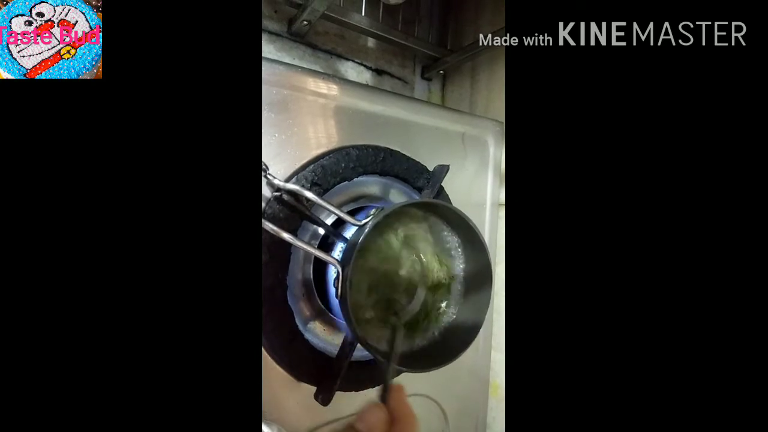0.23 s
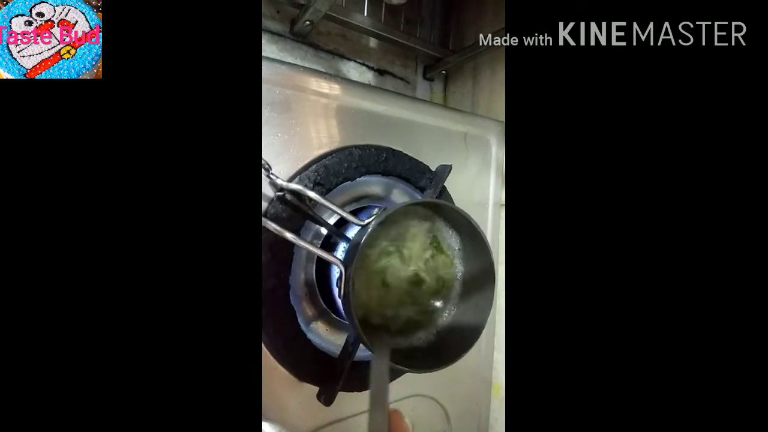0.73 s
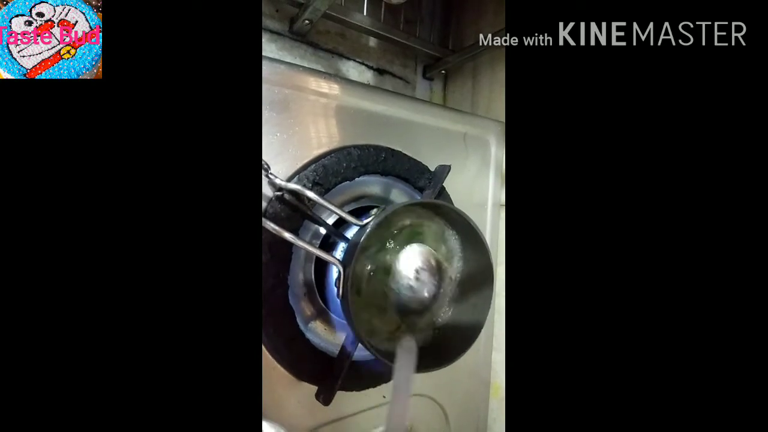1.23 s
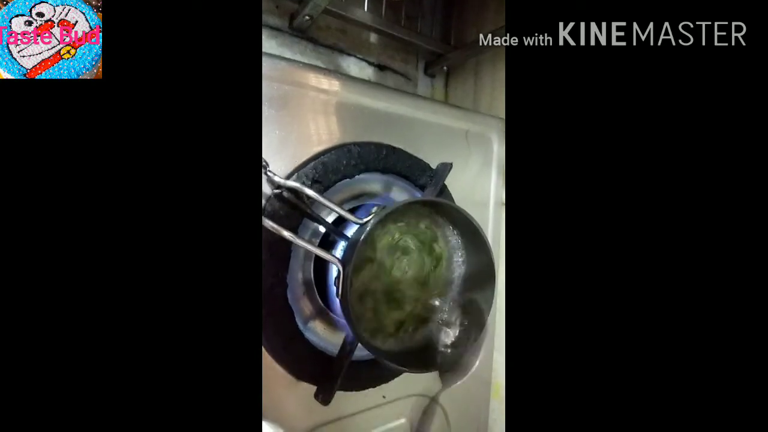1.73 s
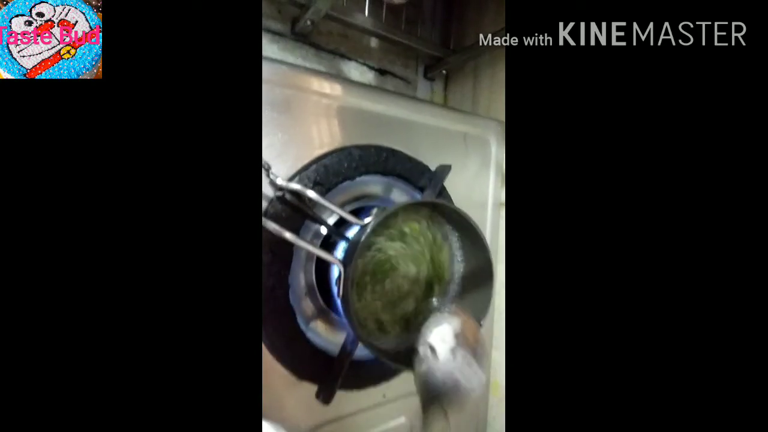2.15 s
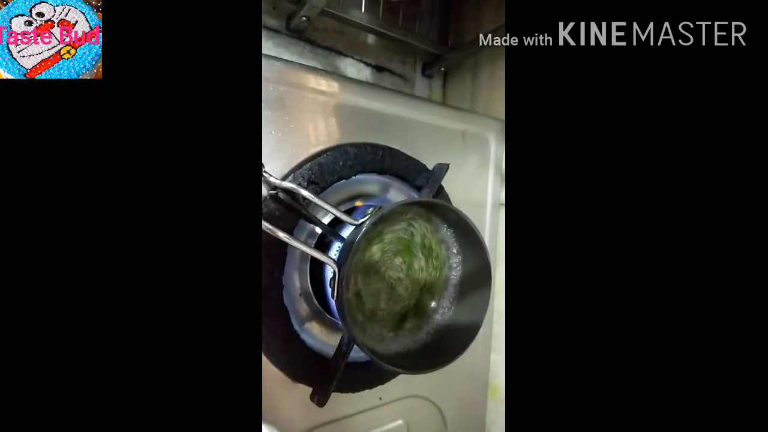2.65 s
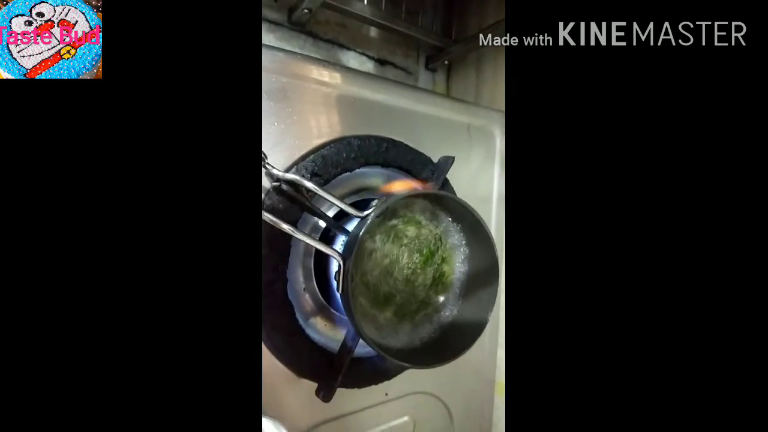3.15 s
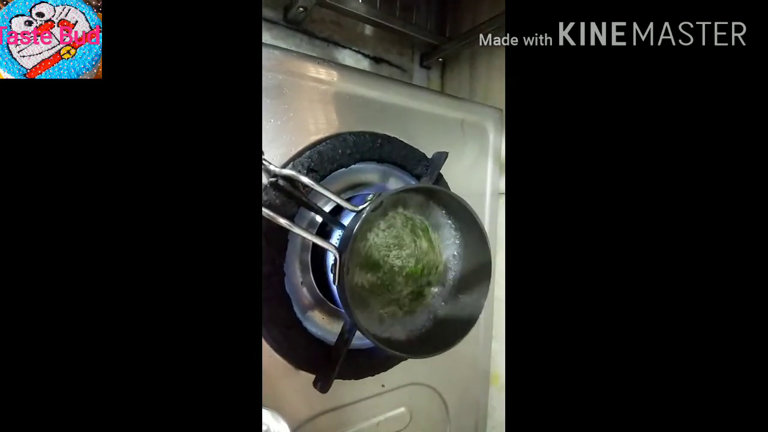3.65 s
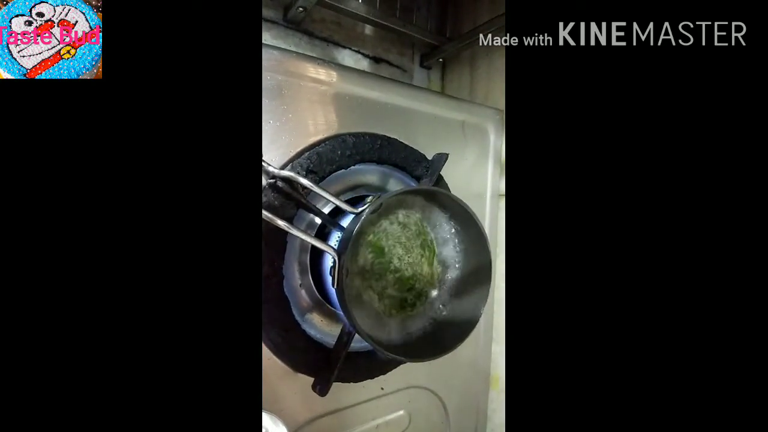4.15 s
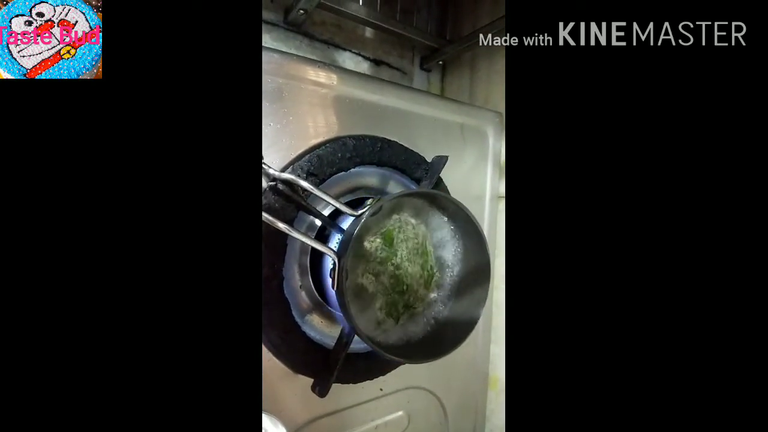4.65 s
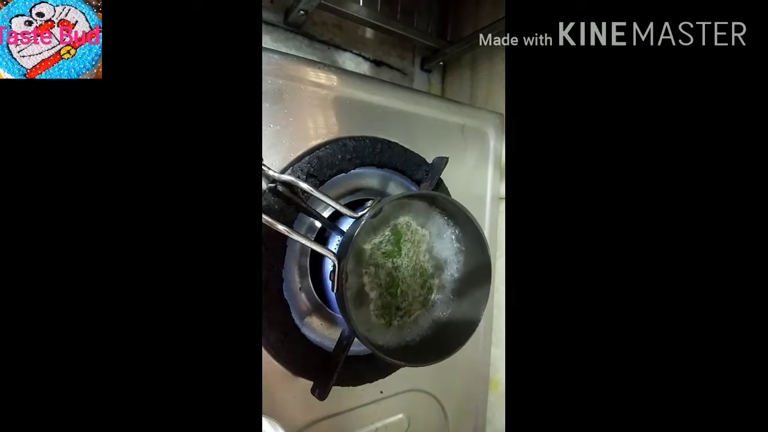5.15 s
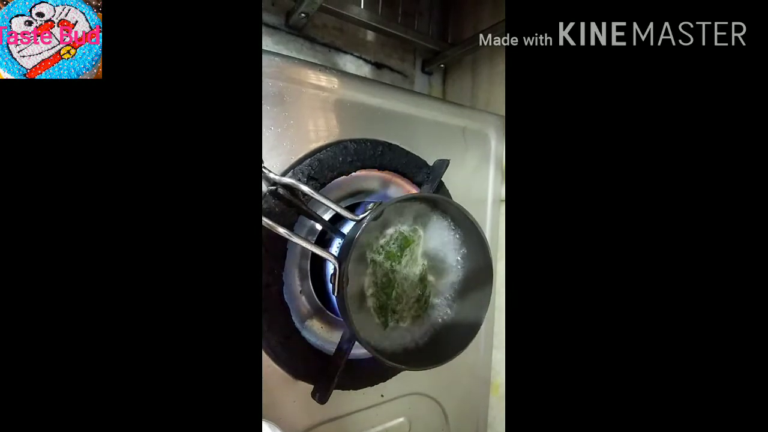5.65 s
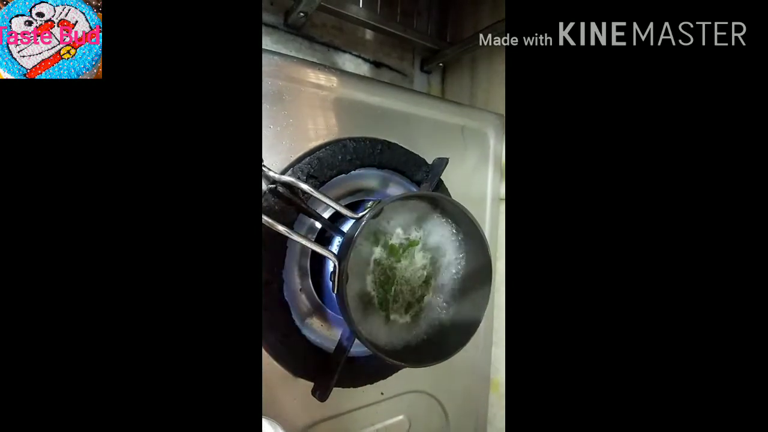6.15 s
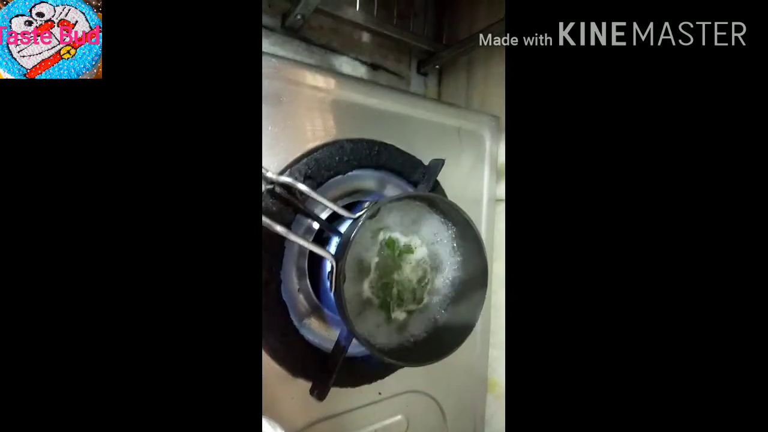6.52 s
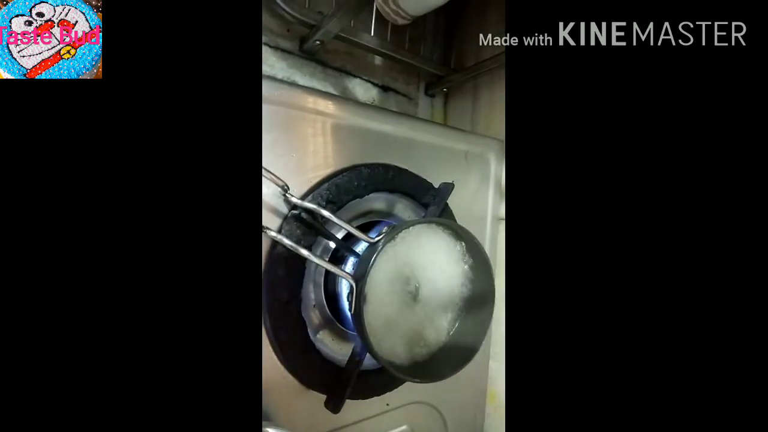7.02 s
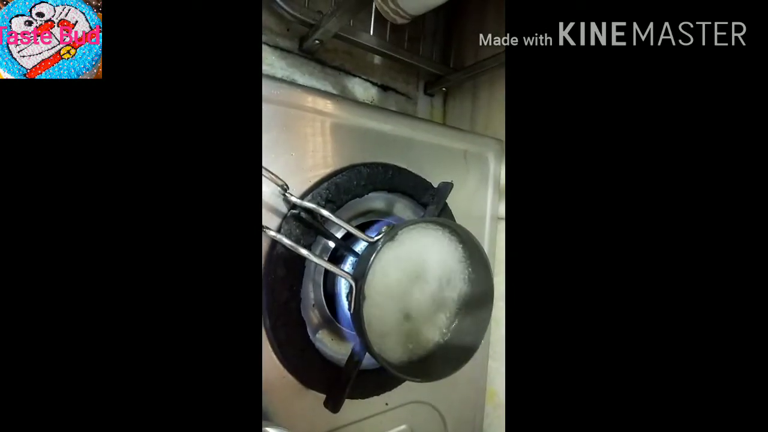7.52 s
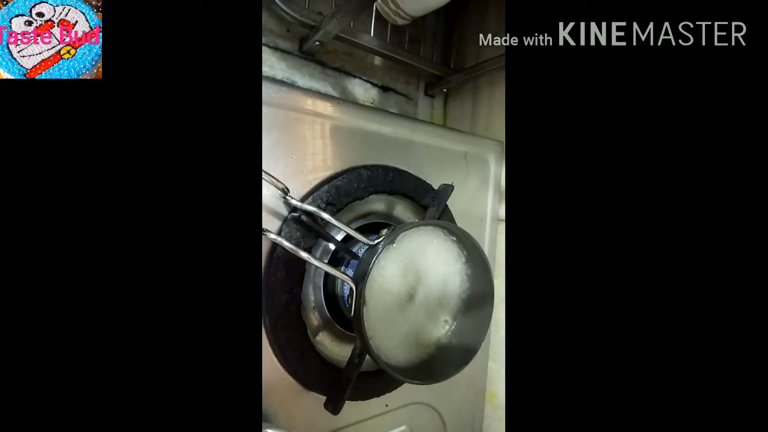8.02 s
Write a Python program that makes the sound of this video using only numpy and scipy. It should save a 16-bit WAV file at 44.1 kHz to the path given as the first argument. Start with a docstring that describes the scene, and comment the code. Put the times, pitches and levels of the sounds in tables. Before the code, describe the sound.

Close to the microphone and to its right, a spoon briefly scrapes and clinks in a steel saucepan of sizzling, oily liquid. The bubbling carries on, with droplets cracking irregularly and the gas burner hissing underneath. Later the hiss drops and a softer foamy fizz joins in. Throughout, distant thumps repeat evenly behind a low kitchen rumble, and a few faint rough tones sound.

```python
"""A dense sizzle and a spoon scraping steel: syrup with oil boils in a small pan over a hissing gas flame,
close to the right of a stereo microphone. Bursting bubbles make the sizzle; droplets spit and crack.
Later the pan foams up and sounds softer. Someone pounds steadily elsewhere in the house,
low noise rumbles in the kitchen's resonances, and a few short rough tones sound."""
import sys
import numpy as np
from scipy import signal
from scipy.fft import rfft, irfft, next_fast_len
from scipy.io import wavfile
from scipy.ndimage import uniform_filter1d, map_coordinates

SR = 44100
rng = np.random.default_rng(int(sys.argv[2]) if len(sys.argv) > 2 else 0)


def waveform_to_disk(signal):
    """Save audio, clipped to [-1, 1], as 16-bit WAV at the path in sys.argv[1]."""
    frames = np.transpose(np.atleast_2d(signal))
    scaled = np.clip(frames, -1, 1) * 32767
    samples = np.round(scaled).astype(np.int16)
    wavfile.write(sys.argv[1], SR, samples)


N = 364795

FOAM_START_S, LEFT_LAG_S, BAND_LIMIT_HZ = 6.39, 6.8e-5, 15700
SURGE_DB, SURGE_LEFT_DB, SURGE_DECAY_S, HALF_SURGE_SPIT_DB = 8.5, 4, 0.031, -12.5
FAINT_DROPS_PER_S, FAINT_DROP_DB = 4, -29
BUBBLES_PER_S, BUBBLE_MEDIAN_HZ, BUBBLE_T60_CYCLES, BUBBLE_DB = 600, 8784, 42, -15.5

# Stereo likeness: (frequency [Hz], left-right correlation [1])
CORRELATION = [(60, 1), (180, 0.9), (330, 0.82), (560, 0.4), (1650, 0.41), (4970, 0.44), (15000, 0)]
# Stereo balance, general and sizzle: (frequency [Hz], left minus right [dB])
BALANCE = [(60, 1), (150, 2), (380, 3), (950, -6.5), (2380, -10), (5980, -3.5), (15000, -15)]
SIZZLE_BALANCE = [(4000, -6), (8000, -1), (13000, 7.5)]
# Four groups of kitchen resonances: (centre [Hz], width [Hz], gain [dB])
BOOM_MODES = [(77, 16, -7), (103.4, 10, -3), (153, 35, -0.5), (234, 18, -1)]
HUM_MODES = [(272.5, 28, 0), (371, 52, -3), (478, 97, -8.5)]
MOAN_MODES = [(544, 25, -5), (592, 102, 15)]
DRONE_MODES = [(698, 89, 11.5), (815, 90, 10), (1081, 164, 9)]
# Rumble per group, same order: (centre [Hz], roar share [dB], resting level [dB])
RUMBLE_GROUPS = [(130, -10.5, -70), (275, -5.5, -127), (580, -1, -81), (800, -3, -103)]
# Roar during the stirring: (time [s], lower groups [dB], upper groups [dB])
ROAR_LEVELS = [(0, -34.5, -39), (.25, -32, -44), (.4, -34.5, -51), (.55, -32, -40.5), (.65, -29, -39.5),
               (.72, -31, -39.5), (.8, -43.5, -34.5), (.87, -34.5, -44), (.97, -47.5, -56),
               (1.15, -54, -93)]
# Murmur after the roar: (time [s], hum [dB], drone [dB])
MURMUR_LEVELS = [(1.1, -84, -70), (1.32, -66, -77), (1.55, -74, -59), (1.65, -86, -55.5), (1.85, -80, -72),
                 (2.2, -65, -61.5), (2.6, -76, -56.5), (3.3, -66, -59.5), (3.6, -55, -55.5),
                 (4.4, -55.5, -57.5), (4.85, -50.5, -53.5), (5.4, -50, -64.5), (6.1, -59, -59),
                 (6.6, -56.5, -68), (6.8, -59, -63.5), (7.6, -71, -68), (7.8, -55, -63), (7.92, -51.5, -74),
                 (8.0, -52, -52), (8.27, -56, -65)]
# Rumble swells: (middle [s], half length [s], level [dB], group centre [Hz])
RUMBLE_SWELLS = [(1.458, 0.068, -54, 130), (2.197, 0.13, -62, 130), (2.564, 0.27, -58, 130),
                 (3.15, 0.064, -62, 580), (3.75, 0.63, -60.5, 580), (4.19, 0.14, -60, 130),
                 (4.906, 0.37, -59.5, 580), (4.924, 0.25, -59, 130), (6.145, 0.12, -56, 130),
                 (6.724, 0.066, -65, 130), (7.317, 0.048, -53, 580), (7.3, 0.12, -60, 130),
                 (7.543, 0.12, -52, 580), (8.016, 0.057, -48, 580), (8.223, 0.14, -46.5, 130)]
# Rough tones: (time [s], start [Hz], end [Hz], level [dB], rise [s], t60 [s], waver [1])
ROUGH_TONES = [(1.38, 765, 650, -49, 0.041, 7, 0.004), (7.775, 81.3, 80, -57, .01, 4.6, .002),
               (7.605, 3390, 3390, -43, 0.025, 0.8, 0.0005), (7.98, 573, 576, -38, 0.011, 0.44, 0.003),
               (7.98, 236, 240, -24, 0.0071, 0.13, 0.0027)]
# Distant blows: (time [s], base level [dB], slap offset [dB], floor ring [Hz])
DISTANT_BLOWS = [(0.485, -25, -21, 233), (0.651, -24.5, -4, 165), (1.341, -21.5, -13.5, 151),
                 (2.017, -22.5, -14, 168), (2.68, -21.5, -16, 159), (3.341, -21, -19, 152.3),
                 (3.999, -21, -16, 156), (4.646, -22.5, -13, 167), (5.329, -24.5, -15, 160),
                 (6.003, -22.5, -15, 168), (6.528, -22.5, -21, 161), (7.155, -22, -18, 162),
                 (7.722, -31, -24, 213), (7.773, -21, -18, 164.5), (7.981, -29.5, -10, 212),
                 (8.229, -27.5, -45, 225)]
# Gas hiss: (time [s], level [dB])
FLAME_LEVELS = [(0, -38.5), (.55, -37), (1.0, -39.5), (3.1, -38.5), (4.2, -39.5), (6.37, -38.5),
                (6.41, -48), (8.27, -47)]
# Spoon friction: (time [s], level [dB])
SCRAPE_LEVELS = [(0, -40.5), (.25, -38), (.33, -36), (.5, -38.5), (.65, -38), (.82, -39), (.9, -53),
                 (.95, -80)]
# Scraped steel: (centre [Hz], width [Hz], gain [dB])
SCRAPE_MODES = [(1096, 150, 3.5), (1810, 210, 3), (2570, 280, -1), (3170, 140, -3), (4400, 60, 4.5),
                (5360, 70, 5)]
# Spoon taps: (time [s], level [dB], knock over tick [dB])
SPOON_TAPS = [(.254, -27, -30), (.2835, -17.5, -30), (.335, -33, -30), (.6505, -33, 9), (.671, -44, 12),
              (.79, -40, 9)]
# Thin pan wall and thick bottom: (frequency [Hz], gain [dB], t60 [s])
WALL_MODES = [(3830, -14, 0.093), (3970, 0, 0.014), (4360, -6, 0.011), (4520, -13, .09), (5680, -15, .06),
              (6600, -26, .05)]
BOTTOM_MODES = [(641, -3, .12), (840, -3, .05), (1110, -1, .012), (1357, 0, .01), (1766, 0, .01)]
# Foam swelling and sinking: (time [s], relative level [dB])
FIZZ_LEVELS = [(6.39, -47.5), (6.546, -45.5), (6.866, -42.5), (7.07, -48.5), (7.3, -43.5), (7.572, -43.5),
               (7.824, -44.5), (8.27, -43.5)]
# Spectra of gas, fizz, sizzle before and during foaming, cracks: (frequency [Hz], gain [dB])
GAS_SPECTRUM = [(300, -62), (650, -40), (1100, -50), (1240, -18), (1410, -10), (1930, 0.5), (2180, -5),
                (2540, 3.5), (2900, -3), (3150, 0.5), (3440, -1), (5000, -1), (6500, -26), (11000, -120)]
FIZZ_SPECTRUM = [(530, -55), (1000, -8.5), (1400, -18), (1650, -18), (1850, -2.5), (3300, -5), (3700, -8),
                 (4500, -11), (5750, -23), (7000, -8), (9100, -35), (15400, -120)]
FRYING_SPECTRUM = [(900, -70), (1760, -26), (3000, -15.5), (4570, -6.5), (6020, -3.5), (6540, -1),
                   (8160, 1.5), (8980, 4.5), (12000, 8), (14700, 6.5), (15600, 1.5)]
FOAMING_SPECTRUM = [(900, -60), (1760, -19), (3000, -15), (3700, -26), (4510, -9.5), (5200, -8), (5750, -9),
                    (6300, -6.5), (9830, 7), (15600, 1.5)]
CRACK_SPECTRUM = [(500, -58), (1500, -3), (3000, -12), (5000, -14.5), (8000, -9), (11000, -6.5),
                  (16000, -10)]
# Sizzle between spits: (time [s], level [dB], left minus right [dB])
SIZZLE_LEVELS = [(0, -30.5, -17), (.3, -28.5, -13), (.62, -28.5, -14.5), (.96, -33.5, -18),
                 (1.3, -31.5, -12), (1.5, -35.5, -22), (2.15, -35.5, -18), (2.5, -32.5, -13),
                 (2.8, -31, -12.5), (3.55, -31.5, -13.5), (3.7, -34, -16), (4.55, -33.5, -15),
                 (4.7, -29, -13), (5.7, -31, -9.5), (6.05, -31.5, -12.5), (6.3, -26.5, -6.5),
                 (6.45, -31, -12), (6.9, -31, -11.5), (7.4, -31, -12), (7.87, -32, -13), (8.27, -30.5, -11)]
# Droplets: (time [s], level [dB], centre [Hz], pop offset [dB], left minus right [dB], spray offset [dB])
DROPLETS = [(0.045, -24, 10700, -18, -9, -8), (.181, -23.5, 9350, -6, -18, 2),
            (0.2282, -13.5, 8650, -23, -19, -17), (0.231, -14, 9600, -12, -8, -12),
            (.4104, -22, 10400, -22, -9, -4), (0.6518, -26, 11800, 8, -6, 5),
            (0.8078, -22.5, 8500, 2, -17, 4), (.9673, -31, 10500, -30, -10, -8),
            (1.004, -15, 13700, -32, -8, -1.5), (1.0232, -11.5, 11100, -15, -5, -13),
            (1.1215, -16, 8050, -36, -18.5, -5.5), (1.2405, -8, 9800, -38, -9.5, -8),
            (1.336, -7, 11700, -40, -8, -6), (1.6737, -25, 10200, -28, -15, -4),
            (1.749, -24, 9300, -32, -21, -4), (2.2516, -12.5, 10600, -40, -12.5, -9),
            (2.371, -8, 8400, -8, -11.5, -4), (2.4316, -27.5, 11300, -12, -7, 11.5),
            (2.561, -5.5, 10520, -38.5, -4.5, -3.5), (2.577, -1, 11100, -5, -4.5, -7),
            (2.6639, -10.5, 11300, -6.5, -6, -13), (2.72, -9, 12800, -25, -3, -13),
            (2.783, -21, 12800, -30, 0, -2), (2.7961, -6, 10400, -15, -8, -8),
            (2.8837, -16, 12100, -11, -8, -11), (2.8868, -6.5, 11800, -25, -9, -15),
            (2.9135, -29, 8600, -30, -8, -10), (2.955, -16.5, 10900, -7, -14, -13),
            (3.0285, -14, 13600, -28, -8, -9), (3.1024, -11, 11700, -3.5, -3, -5),
            (3.2077, -15.5, 13800, -30.5, -10, -0.5), (3.2442, -13, 12100, -28, -9, -10),
            (3.25, -17, 9200, -30, -2, 5), (3.2654, -16, 10750, -35, -4, 2),
            (3.326, -13.5, 8550, -12, -8, -8), (3.372, -25, 12200, -9, -19, -9),
            (3.403, -17, 12000, -2, -9, -19), (3.41, -14, 12200, -10, -11, -12),
            (3.488, -3.5, 8850, -21, -3, -19), (3.574, -17, 12600, -9, -6, 4),
            (3.5933, -24.5, 13000, -25, -9, 11), (3.6402, -21, 11100, -30, -13, -3),
            (3.832, -20, 8000, -30, -8, -12), (3.839, -10, 10200, -27, -7, -5),
            (3.9556, -17, 13400, -24, -7, -8), (4.01, -23, 10700, -14, -13, -4),
            (4.025, -22, 9000, -30, -15, -8), (4.2982, -11, 10300, -25, -7, -6),
            (4.444, -14, 11300, -17, -13, -7), (4.8782, -16, 10700, -10, -5, 3),
            (4.951, -7.5, 11200, -23, -4, 2), (5.1295, -8.5, 11200, -22, -9, -7),
            (5.2928, -18, 10900, -20, -12, 3), (5.3324, -8.5, 10300, -3.5, -2, -0.5),
            (5.4126, -3.5, 10700, -14.5, 1, -10), (5.4942, -12.5, 11300, -10, -5, -4),
            (5.528, -15.5, 10500, -27, -5, -4), (5.559, -17, 11500, -30, -6, -8),
            (5.642, -12.5, 10600, -17, -3, -6), (5.684, -10, 9850, -9, -3, -2),
            (5.702, -12, 10500, -30, -4, -5), (5.738, -21, 11300, -4, 1, -1),
            (5.876, -13, 10600, -18, -6, 3), (5.895, -15, 9500, -30, -4, -10),
            (5.911, -15, 9870, -21, -3, 4), (6.1387, -22, 12100, -32, -15, -2),
            (6.178, -24, 10500, -35, 5, -8), (6.2138, 1, 11070, -16, 6, -4.5),
            (6.3458, -19.5, 10900, -5, -1, 9), (6.64, -14.5, 10100, -34, -10, -4),
            (6.7539, -5, 10000, -7, -4, -4.5), (6.8893, -14.5, 9700, -26, -9, 2.5),
            (6.9067, -12.5, 10500, -29, -3, 0), (6.973, -18, 10600, -35, -6, 4.5),
            (7.0575, -13.5, 9500, -36, -6, 1), (7.3708, -16, 9500, -6, -3, -3),
            (7.432, -17.5, 10700, -8, -5, -11)]


def amp(db):
    """Gain of a level in dB."""
    return 10 ** (np.asarray(db) / 20)


def decay(t, t60_s):
    """Exponential fall, 60 dB in t60_s."""
    return amp(-60 * t / t60_s)


def unit_rms(x):
    """x at rms 1."""
    return x / np.sqrt(np.mean(x ** 2) + 1e-20)


def at_hz(points, hz):
    """Interpolate (frequency [Hz], value) points on a log axis."""
    knots_hz, values = np.transpose(points)
    return np.interp(np.log(hz + 1), np.log(knots_hz + 1), values)


def curves(rows):
    """Per-sample curve for each column after the time."""
    times_s, *columns = np.transpose(rows)
    return [np.interp(np.arange(N) / SR, times_s, column) for column in columns]


def wobble(knots_per_s):
    """Smooth random curve."""
    knots = rng.standard_normal(int(N * knots_per_s / SR) + 4)
    return map_coordinates(knots, [np.arange(N) * knots_per_s / SR])


def filtered(x, response):
    """Apply a complex frequency response."""
    size = next_fast_len(N + SR // 2)
    return irfft(rfft(x, size) * response(np.fft.rfftfreq(size, 1 / SR)), size)[..., :N]


def resonances(modes):
    """Response of parallel band-pass modes, alternating in sign."""
    return lambda hz: sum(
        (-1) ** k * amp(db) * 1j * hz * width_hz / (centre_hz ** 2 - hz ** 2 + 1j * hz * width_hz)
        for k, (centre_hz, width_hz, db) in enumerate(modes))


def sides(lean_db):
    """Channel gains for a left-minus-right level."""
    return amp(np.array([lean_db / 2, -lean_db / 2]))


def patchy_noise(depth_db):
    """Two noises sharing random gain patches in time and frequency."""
    spectra = signal.stft(rng.standard_normal((2, N)), nperseg=512)[2]
    patches = uniform_filter1d(rng.standard_normal(spectra.shape[1:]), size=6, axis=0)
    patches = uniform_filter1d(patches, size=8, axis=1)
    return signal.istft(spectra * amp(depth_db * unit_rms(patches)), nperseg=512)[1][:, :N]


def at_mic(pair, response):
    """Filter two independent signals into stereo: alike in the bass, treble to the right, left late."""
    def mid_side_gains(hz):
        angle = np.arccos(np.clip(at_hz(CORRELATION, hz), -1, 1)) / 2
        return response(hz) * [np.cos(angle), np.sin(angle)]

    mid, side = filtered(pair, mid_side_gains)
    lag_s = np.array([[LEFT_LAG_S], [0]])
    return filtered(np.array([mid + side, mid - side]),
                    lambda hz: sides(at_hz(BALANCE, hz)) * np.exp(-2j * np.pi * hz * lag_s))


def rumble():
    """Unsteady noise rings the kitchen's resonances: a roar, then a murmur with short swells."""
    total, t = 0, np.arange(N) / SR
    lower_db, upper_db = curves(ROAR_LEVELS)
    hum_db, drone_db = curves(MURMUR_LEVELS)
    layers = [(BOOM_MODES, lower_db, 0), (HUM_MODES, lower_db, amp(hum_db)),
              (MOAN_MODES, upper_db, 0), (DRONE_MODES, upper_db, amp(drone_db))]
    for (centre_hz, share_db, rest_db), (modes, roar_db, murmur) in zip(RUMBLE_GROUPS, layers):
        swells = sum(amp(db) * np.exp(-((t - middle_s) / half_s) ** 2)
                     for middle_s, half_s, db, hz in RUMBLE_SWELLS if hz == centre_hz)
        gain = amp(roar_db + share_db) + amp(rest_db) + murmur + swells
        noise = amp(1.8 * wobble(14) + 1.6 * wobble(4)) * patchy_noise(depth_db=3)
        room = resonances(modes)
        ringing = at_mic(noise, lambda hz: room(hz) * np.abs(room(hz)) ** 1.2)  # deepened valleys
        total = total + gain * unit_rms(ringing)
    return total


def rough_tones():
    """Wavering sines: a hollow falling note, a thin squeak, a deep hum, a ringing bump."""
    out, t = np.zeros(N + SR), np.arange(int(0.7 * SR)) / SR
    for time_s, start_hz, end_hz, db, rise_s, t60_s, waver in ROUGH_TONES:
        drift = uniform_filter1d(np.cumsum(rng.standard_normal(len(t))), size=60)
        cycles = np.cumsum(np.linspace(start_hz, end_hz, len(t))) / SR
        tone = np.sin(2 * np.pi * cycles + drift * waver * np.sqrt(start_hz))
        fade = (1 - np.exp(-t / rise_s)) * np.sqrt(np.abs(np.cos(np.pi / 2 * t / t[-1])))
        flicker = amp(3 * wobble(40)[:len(t)])
        out[round(time_s * SR):][:len(t)] += amp(db) * decay(t, t60_s) * fade * flicker * tone
    return out[:N] * sides(-3.5)[:, None]


def pounding():
    """Each blow slaps, then thumps; the floor rings on and the room resonances die away."""
    thumps, slaps, echoes = np.zeros(N + SR), np.zeros((2, N + SR)), np.zeros((2, N + SR))
    t = np.arange(SR // 2) / SR
    thump_t = t - 0.0095
    echo_shape = (1 - np.exp(-t / 0.004)) * decay(t, 0.19)
    for time_s, db, slap_db, floor_hz in DISTANT_BLOWS:
        start = round(time_s * SR)
        span = slice(start, start + len(t))
        pulse = np.sin(2 * np.pi * 1.23 * floor_hz * thump_t) * np.exp(-0.5 * (thump_t / 0.0013) ** 2)
        floor = 0.4 * np.sin(2 * np.pi * floor_hz * thump_t) * decay(t, 0.15) * (thump_t > 0)
        thumps[span] += amp(db - 4.5) * (pulse + floor)
        slaps[:, span] += amp(db + slap_db + 10.5) * decay(t, 0.12) * rng.standard_normal((2, len(t)))
        echoes[:, span] += amp(db + 10.5) * echo_shape * rng.standard_normal((2, len(t)))
    direct = filtered(thumps[:N], lambda hz: hz ** 2 / (hz ** 2 + 70 ** 2))
    slap = at_mic(slaps[:, :N], resonances([(776, 120, 0.68), (1153, 124, 1)]))
    room = resonances(BOOM_MODES + HUM_MODES)
    return direct + slap + at_mic(echoes[:, :N], lambda hz: room(hz) / (1 + (hz / 450) ** 4))


def flame():
    """Gas jets hiss; the level drops as the foaming starts."""
    level_db, = curves(FLAME_LEVELS)
    hiss = at_mic(patchy_noise(depth_db=1.2), lambda hz: amp(at_hz(GAS_SPECTRUM, hz)))
    return amp(level_db) * unit_rms(hiss)


def spoon_scrape():
    """Uneven friction on the pan bottom rings the steel."""
    level_db, = curves(SCRAPE_LEVELS)
    friction = amp(2.5 * wobble(40)) * patchy_noise(depth_db=1.5)
    return amp(level_db) * unit_rms(at_mic(friction, resonances(SCRAPE_MODES)))


def spoon_taps():
    """The spoon strikes the pan: bright tick from the wall, dull knock from the bottom."""
    out, t = np.zeros(N + SR), np.arange(SR // 5) / SR
    attack = 1 - np.exp(-t / 0.00033)

    def ring(modes):
        return sum(amp(db + rng.normal(0, 0.86)) * decay(t, t60_s) * np.sin(2 * np.pi * hz * t)
                   for hz, db, t60_s in modes)

    for time_s, db, knock_db in SPOON_TAPS:
        tap = ring(WALL_MODES) + amp(knock_db) * ring(BOTTOM_MODES)
        out[round(time_s * SR):][:len(t)] += amp(db) * attack * tap
    return out[:N] * sides(-4)[:, None]


def foam_fizz():
    """Rising foam fizzes in patches."""
    level_db, = curves(FIZZ_LEVELS)
    noise = amp(1.5 * wobble(7) + 1.2 * wobble(22)) * patchy_noise(depth_db=4)
    fizz = unit_rms(at_mic(noise, lambda hz: amp(at_hz(FIZZ_SPECTRUM, hz))))
    return (np.arange(N) / SR > FOAM_START_S) * amp(level_db - 4) * fizz


def bubbles():
    """Tiny bubbles burst across the pan, each ringing briefly at its own pitch."""
    count = round(BUBBLES_PER_S * N / SR)
    when, size, where = rng.random((count, 3)).T
    hz = np.clip(BUBBLE_MEDIAN_HZ * np.exp(0.45 * rng.standard_normal(count)), 2500, 15000)[:, None]
    age = np.arange(96)  # samples
    rings = np.sin(2 * np.pi * hz * age / SR) * decay(age / SR, BUBBLE_T60_CYCLES / hz)
    rings *= 1 - np.exp(-age / 3)
    size_db = np.minimum(-5.5 * np.log(size + 1e-9), 18)
    gains = amp(size_db) * sides(16 * (where - 0.5))
    indices = ((when[:, None] * N).astype(int) + age).ravel()
    channels = [np.bincount(indices, (gain[:, None] * rings).ravel(), N)[:N] for gain in gains]
    return unit_rms(np.array(channels))


def spit_surge():
    """Control curve, 0 to 1: jumps at each listed droplet, then decays."""
    times_s, db = np.transpose(DROPLETS)[:2]
    kicks = np.bincount((times_s * SR).astype(int), amp(db - HALF_SURGE_SPIT_DB), N)
    tail = np.exp(-np.arange(SR) / SR / SURGE_DECAY_S)
    agitation = np.abs(signal.fftconvolve(kicks, tail)[:N])
    return uniform_filter1d(agitation / (1 + agitation), size=1500)


def sizzle():
    """Noise jumps with hundreds of bursting bubbles a second; spits swell it and shift it left."""
    level_db, lean_db = curves(SIZZLE_LEVELS)
    surge = spit_surge()
    onsets = rng.random(N) < 400 * amp(5 * wobble(12)) / SR
    bursts = onsets * amp(np.minimum(5 * rng.exponential(size=N), 17))
    burst_shape = decay(np.arange(SR // 50) / SR, 0.006)
    grain = np.sqrt(1 + 0.22 * np.abs(signal.fftconvolve(bursts ** 2, burst_shape ** 2)[:N]))
    hiss = grain * amp(0.6 * wobble(25) + 0.4 * wobble(70)) * patchy_noise(depth_db=1.3)
    boil = unit_rms(hiss) + amp(BUBBLE_DB) * bubbles()
    frying, foaming = (
        unit_rms(filtered(boil, lambda hz: amp(at_hz(spectrum, hz)) * sides(at_hz(SIZZLE_BALANCE, hz))))
        for spectrum in (FRYING_SPECTRUM, FOAMING_SPECTRUM))
    gain = amp(level_db + SURGE_DB * surge) * sides(lean_db + SURGE_LEFT_DB * surge)
    return gain * np.where(np.arange(N) / SR < FOAM_START_S, frying, foaming)


def faint_droplets():
    """Random small droplets, columns as in DROPLETS."""
    draws = rng.random((round(FAINT_DROPS_PER_S * N / SR), 4))
    return [(when * (N - 1) / SR, FAINT_DROP_DB + 6 * size, 8500 + 4000 * pitch, -22, -5 - 10 * where, -8)
            for when, size, pitch, where in draws]


def spits():
    """Each droplet cracks and sprays briefly; its steam pocket gives one low pop."""
    cracks, pops, t = np.zeros((2, N + SR)), np.zeros((2, N + SR)), np.arange(SR // 8) / SR
    attack = 1 - np.exp(-t / 0.0001)
    spray = 0.8 * decay(t, 0.045) + 0.15 * decay(t, 0.3)
    steam_pulse = np.sin(2 * np.pi * 1300 * t) * decay(t, 0.00074)
    for time_s, db, hz, pop_db, lean_db, spray_db in list(DROPLETS) + faint_droplets():
        tearing = amp(3 * np.repeat(rng.standard_normal(len(t)), 12)[:len(t)])
        burst = 0.85 * decay(t, 0.003) + 0.7 * np.exp(-(t / 0.003) ** 4) * tearing
        white = rng.standard_normal((2, len(t)))
        treble = signal.lfilter(*signal.butter(2, 0.44 * hz, "highpass", fs=SR), white)
        band = signal.lfilter(*signal.butter(1, [0.97 * hz, 1.03 * hz], "bandpass", fs=SR), white)
        noise = 0.22 * treble + 0.3 * band
        # rms 1 within the burst, so each crack keeps its size
        noise /= np.sqrt(np.sum((burst * noise) ** 2, axis=1, keepdims=True) / np.sum(burst ** 2))
        start, gain = round(time_s * SR), amp(db) * sides(lean_db)[:, None]
        cracks[:, start:start + len(t)] += gain * attack * (burst + amp(spray_db) * spray) * noise
        pop = steam_pulse + 0.14 * decay(t, 0.27) * rng.standard_normal((2, len(t)))
        pops[:, start + 30:start + 30 + len(t)] += gain * amp(pop_db) * pop
    cracks = filtered(cracks, lambda hz: amp(at_hz(CRACK_SPECTRUM, hz)))
    pops = filtered(pops, lambda hz: (1j * hz / (450 + 1j * hz)) ** 2 / (1 + 1j * hz / 3500))
    return cracks + pops


def scene():
    """Stereo sum of stove and house."""
    stove = sizzle() + spits() + flame() + foam_fizz() + spoon_scrape() + spoon_taps()
    return stove + rumble() + pounding() + rough_tones()


def record(dry):
    """Soft clip near full scale, 25 Hz high-pass, hard band limit."""
    clipped = dry / (1 + np.abs(dry / 0.88) ** 8) ** (1 / 8)
    return filtered(clipped, lambda hz: (hz < BAND_LIMIT_HZ) * (1j * hz / (25 + 1j * hz)) ** 2)


dry = scene()
out = record(dry)
waveform_to_disk(out)
```